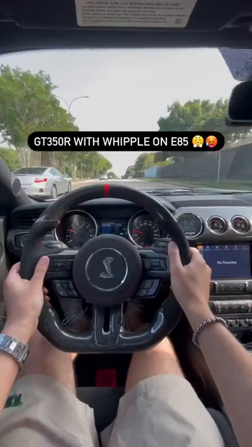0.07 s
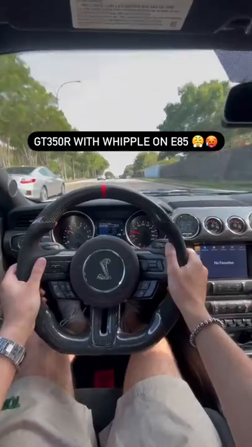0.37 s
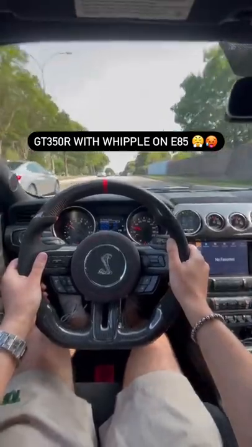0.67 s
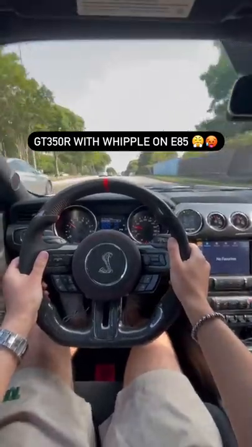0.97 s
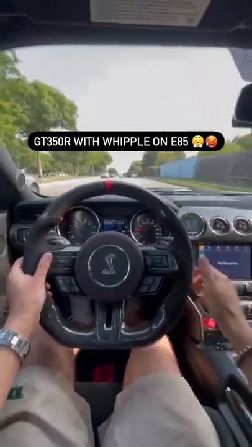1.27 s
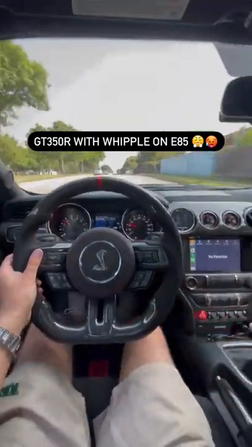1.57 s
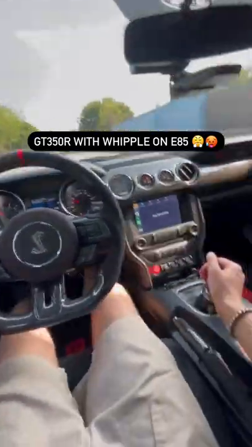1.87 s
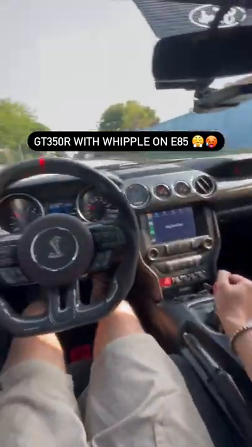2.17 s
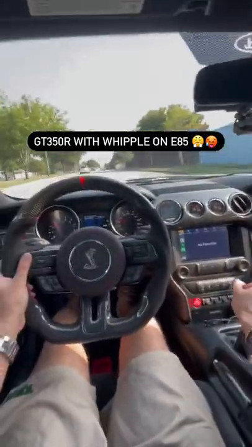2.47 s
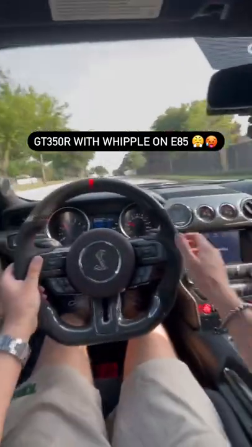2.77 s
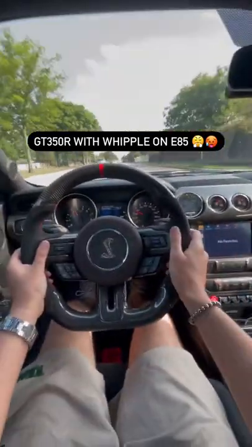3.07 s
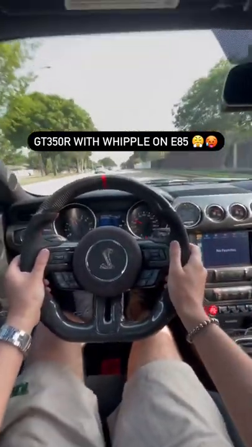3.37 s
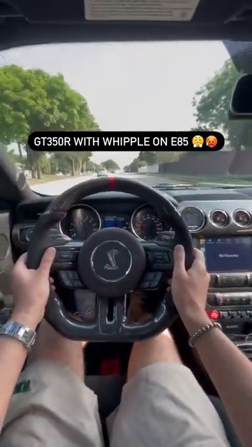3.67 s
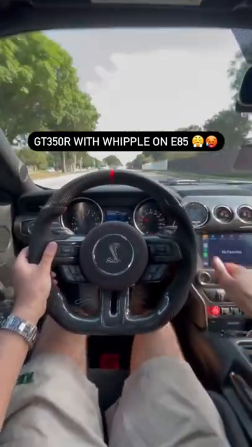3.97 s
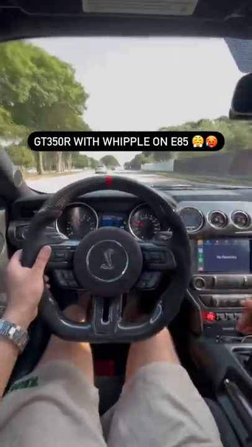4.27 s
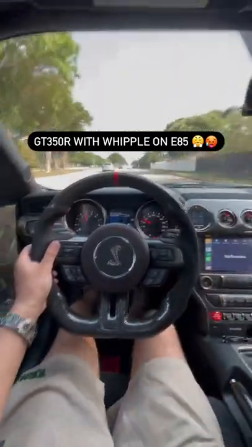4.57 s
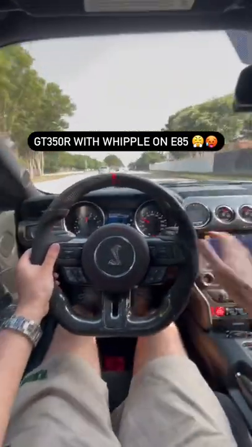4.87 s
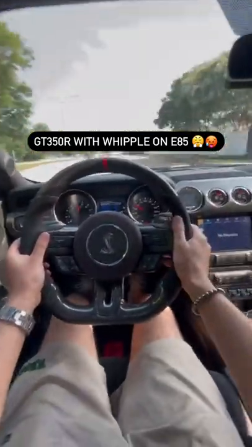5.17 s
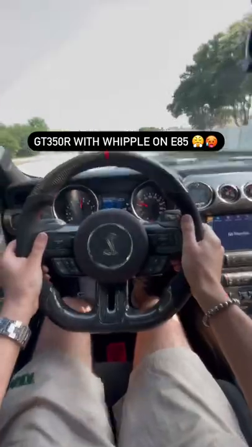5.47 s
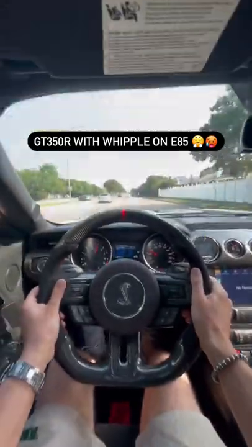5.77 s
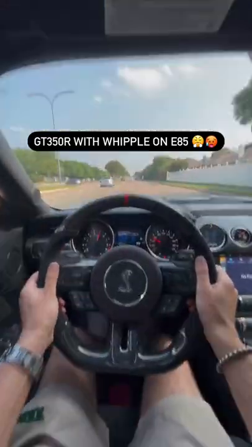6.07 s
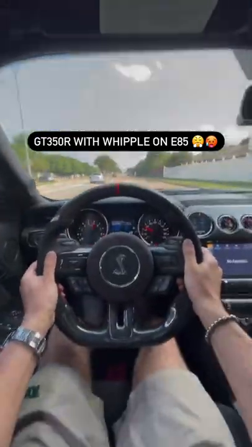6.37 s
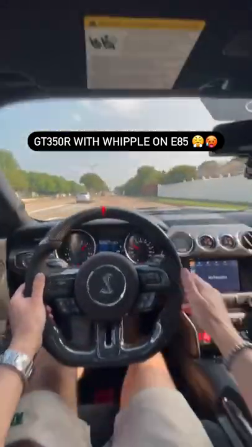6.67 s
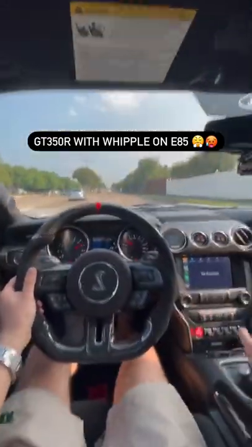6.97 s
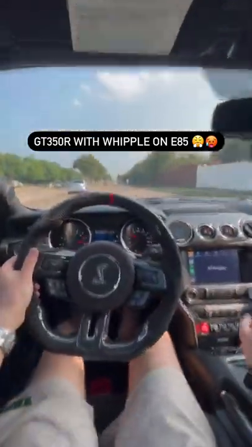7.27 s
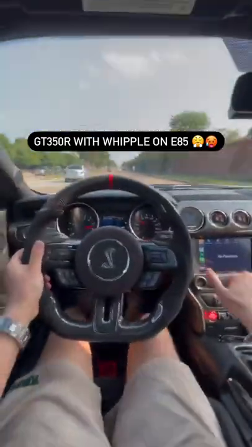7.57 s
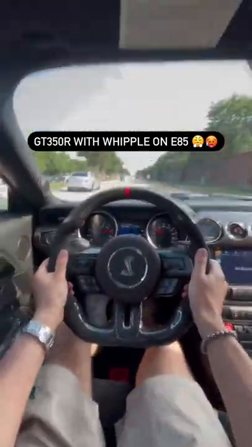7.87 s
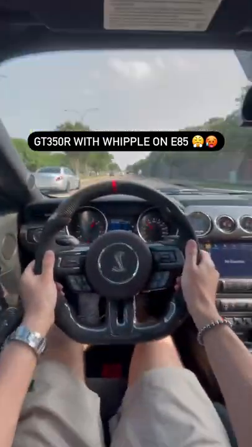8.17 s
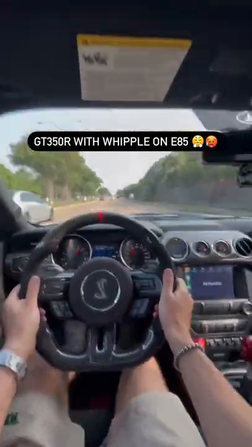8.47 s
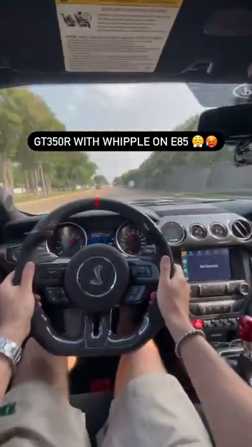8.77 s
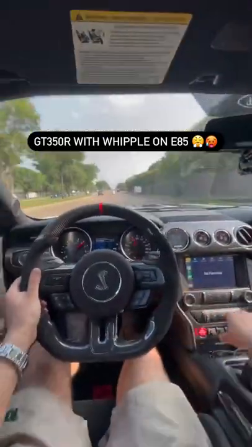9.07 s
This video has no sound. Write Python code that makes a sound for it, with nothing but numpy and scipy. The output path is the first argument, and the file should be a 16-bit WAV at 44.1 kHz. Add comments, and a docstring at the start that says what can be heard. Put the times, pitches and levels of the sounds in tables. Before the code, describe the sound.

Inside a sports car, the engine pulls, eases off with revs and pops, then roars to high revs with supercharger whine and shifts up.

```python
"""Inside a supercharged V8 coupe. Over the rumble of the road it pulls hard from low revs: uneven firings
drone and howl through the cabin, exhaust gas rasps once a firing and the intake rushes. From 2 s the
throttle lifts and two blipped downshifts follow, with pops in the pipe. From 5 s it runs to high revs,
the valves clattering and the blower's rotors whining. It shifts up just after 7 s and runs up again,
and a rasping scream swells near 9 s."""
import sys
import numpy as np
from scipy import signal
from scipy.fft import rfft, irfft, next_fast_len
from scipy.io import wavfile

SR = 44100
rng = np.random.default_rng(int(sys.argv[2]) if len(sys.argv) > 2 else 0)


def file_out(sig):
    """Save sig as 16-bit WAV at sys.argv[1]."""
    # one column per channel
    cols = np.atleast_2d(sig).T
    # limit, then scale
    lim = np.clip(cols, -1, 1)
    pcm = np.round(lim * 32767).astype(np.int16)
    wavfile.write(sys.argv[1], SR, pcm)


N = 402633
TIME = np.arange(N) / SR


def undb(db):
    """Decibels to gain."""
    return 10 ** (np.asarray(db) / 20)


def curves(table):
    """Each column of a timed table at every sample."""
    time_s, *columns = np.transpose(table)
    return [np.interp(TIME, time_s, column) for column in columns]


def response(table, hz):
    """Gain of a (freq_hz, gain_db) table at hz."""
    freq_hz, gain_db = np.transpose(table)
    return undb(np.interp(np.log(hz), np.log(freq_hz), gain_db))


def colour(x, table):
    """Filter by a (freq_hz, gain_db) table, rolling off above its last point; rms 1."""
    size = next_fast_len(N)
    hz = np.maximum(np.fft.rfftfreq(size, 1 / SR), 1)
    rolloff = np.minimum(table[-1][0] / hz, 1) ** 2
    y = irfft(rfft(x, size) * response(table, hz) * rolloff, size)[:N]
    return y / y.std()


def noise(table):
    """Coloured noise; rms 1."""
    return colour(rng.standard_normal(N), table)


def walk(rate_hz, count=2048):
    """Smooth random drift; spread near 1."""
    points = signal.resample(rng.standard_normal(count), 4 * count)
    return np.interp(TIME * rate_hz, np.arange(len(points)) / 4, points)


def engine_line(cycles, order, flutter_db, smear_rad):
    """Sine at order times the cycle rate; uneven combustion shakes its level and phase."""
    knots_s = TIME[::64]
    flutter, shake = (signal.resample(rng.standard_normal(count), len(knots_s)) for count in (120, 420))
    level = np.sqrt(2) * np.interp(TIME, knots_s, undb(flutter_db * flutter))
    phase = 2 * np.pi * (order * cycles + rng.random()) + smear_rad * np.interp(TIME, knots_s, shake)
    return level * np.sin((phase % (2 * np.pi)).astype(np.float32))


# road noise: time_s, level_db
ROAD_LEVEL = [(0.05, -12.5), (0.15, -18), (0.2, -18.5), (0.98, -25.5), (1.16, -19), (1.21, -30),
              (1.95, -25.5), (5.16, -19), (5.39, -24), (5.92, -20), (6.37, -23.5), (9.13, -24)]
# body and tyre spectra: freq_hz, gain_db
BODY_SPECTRUM = [(15, -38), (28, 11), (42, 23), (56, 25.5), (68, 19), (90, -59)]
TYRE_SPECTRUM = [(45, -40.5), (70, 6), (90, 6.5), (110, -0.5), (140, 5), (180, -4.5), (240, -4),
                 (400, -61.5)]


def road(body_db=-2.0, tyre_db=-1.0):
    """The body booms on its springs and the tyres drum on the floor."""
    rumble = undb(body_db) * noise(BODY_SPECTRUM) + undb(tyre_db) * noise(TYRE_SPECTRUM)
    return undb(curves(ROAD_LEVEL)[0]) * rumble


# engine speed: time_s, speed_rpm
ENGINE_SPEED = [(0.0, 2338), (0.24, 2443), (0.54, 2552), (0.86, 2668), (0.98, 2733), (1.2, 2799),
                (1.28, 2859), (1.7, 2958), (1.84, 2938), (2.14, 2715), (2.22, 2789), (2.36, 3334),
                (2.48, 3521), (2.8, 3450), (3.0, 3699), (3.18, 3581), (3.34, 3728), (3.5, 3729),
                (3.8, 3869), (4.0, 3816), (4.1, 3462), (4.22, 3287), (4.44, 4373), (4.52, 4594),
                (4.7, 4186), (4.86, 4038), (5.32, 5032), (5.46, 5280), (5.52, 5254), (5.7, 4969),
                (5.82, 5045), (5.94, 5197), (6.0, 5388), (6.14, 5547), (6.34, 6039), (6.44, 6339),
                (6.58, 6605), (6.68, 6967), (6.74, 7016), (6.88, 7381), (6.96, 7429), (7.12, 8181),
                (7.54, 7003), (7.6, 7108), (7.82, 5045), (7.84, 5016), (8.1, 5599), (8.32, 5683),
                (8.42, 5914), (8.62, 6026), (8.68, 6228), (8.92, 6328), (9.04, 6530), (9.12, 6733)]
# engine load, as air rushing past the throttle: time_s, level_db
ENGINE_LOAD = [(0.05, -36), (0.93, -33.5), (1.64, -36), (1.84, -50.5), (2.07, -57.5), (2.29, -49),
               (2.335, -43.5), (2.4, -43), (2.45, -42), (2.56, -54), (2.68, -54.5), (2.72, -49),
               (2.76, -55.5), (3.24, -56.5), (3.41, -43.5), (3.84, -37), (4.22, -56.5), (4.5, -32),
               (4.8, -50), (4.86, -42), (5.03, -53.5), (5.36, -49), (5.49, -34), (5.61, -36), (5.79, -47.5),
               (5.86, -48.5), (6.02, -33.5), (6.17, -29.5), (6.73, -30.5), (7.13, -34), (7.23, -44),
               (7.43, -36.5), (7.61, -47.5), (7.71, -42.5), (8.17, -34), (9.0, -32), (9.13, -33.5)]
# exhaust effort, as the strength of its bark: time_s, level_db
EXHAUST_EFFORT = [(0.05, -19.5), (0.6, -22), (0.8, -19.5), (1.14, -20.5), (1.66, -26.5), (1.72, -39.5),
                  (1.79, -48.5), (2.15, -55), (2.32, -20), (2.45, -23), (2.53, -48), (2.7, -36.5),
                  (2.78, -54), (3.26, -35), (3.36, -26), (3.87, -22.5), (4.2, -44), (4.47, -13.5),
                  (4.55, -18.5), (4.6, -37.5), (4.78, -35.5), (4.83, -31.5), (5.0, -39), (5.33, -31.5),
                  (5.46, -19.5), (5.56, -19), (5.76, -26), (5.94, -22.5), (6.0, -16.5), (6.15, -20),
                  (6.6, -24), (6.67, -19), (7.02, -25.5), (7.12, -20), (7.2, -28.5), (7.51, -31.5),
                  (7.56, -37), (7.79, -28), (8.77, -23), (8.98, -19), (9.13, -25)]
# drive by part: level_db, db_per_load_db, db_per_effort_db, db_per_rev_octave
PART_DRIVE = {"bank": (1, -0.2, 0.1, 0.095), "firing": (-1.1, -0.079, 0.89, 0.61),
              "overtones": (-0.68, -0.058, 1, 0), "burble": (-34, 0.12, 0.6, 3),
              "howl": (-23.5, 0.3, 0.58, 5), "roar": (-30, -0.39, 0.47, 0.5), "bark": (-27, 0.77, 1, -4.5),
              "rasp": (-27, 0.16, 0.54, -1), "clatter": (-30.5, 0.99, 0.2, 1.5),
              "rush": (-30.5, 1.23, 0.16, 0.16), "blower": (-10, 1.18, 0.35, 13.5)}


def engine_state(open_throttle_db=-34, hard_pull_db=-20, mid_rpm=4000):
    """Load, effort and revs set each part's gain; a closed throttle burns raggedly, smearing the lines."""
    rpm = curves(ENGINE_SPEED)[0]
    load_db = curves(ENGINE_LOAD)[0] - open_throttle_db
    effort_db = curves(EXHAUST_EFFORT)[0] - hard_pull_db
    octaves = np.log2(rpm / mid_rpm)
    gain = {part: undb(db + per_load * load_db + per_effort * effort_db + per_octave * octaves)
            for part, (db, per_load, per_effort, per_octave) in PART_DRIVE.items()}
    smear = np.interp(effort_db, [-14, -4], [1.7, .25]) * np.interp(rpm, [4500, 5500], [1, .28])
    return rpm, gain, smear


def firings(cycles, scatter_db=2.0, uneven_db=2, skew=0.036, cylinders=8):
    """One lopsided pulse per cylinder; also the latest firing's age (0 to 1) and strength."""
    jitter = .06 * walk(200)  # each charge burns a little early or late
    beat = cylinders * cycles + skew * np.sin(2 * np.pi * cycles) + jitter
    index = np.maximum(np.floor(beat), 0).astype(int)
    random_db = scatter_db * rng.standard_normal(N // cylinders)[index]
    strength = undb(random_db + uneven_db * np.cos(2 * np.pi * index / cylinders))
    pulses = np.diff(index, prepend=index[0]) * strength
    return pulses, beat % 1, strength


# bank boom, sinking after the upshift: time_s, level_db
BANK_LEVEL = [(7.35, -0.5), (7.85, -6), (8.6, -3.5)]
# pipe and cabin standing waves met by 0.5, 1, 2 and 3 times the firing rate: freq_hz, gain_db
BANK_RESPONSE = [(80, -23), (92, -37.5), (128, -33), (138, -21), (176, -21), (212, -19.5), (233, -38.5),
                 (245, -23.5), (270, -18)]
FIRING_RESPONSE = [(160, -16), (178, -27), (200, -27.5), (226, -24), (335, -22.5), (358, -17.5), (375, -21),
                   (398, -14), (431, -31.5), (450, -20), (480, -17), (505, -21)]
SECOND_RESPONSE = [(316, -17), (331, -12.5), (344, -28.5), (390, -17.5), (438, -27), (459, -31), (520, -18),
                   (662, -42.5), (693, -25), (724, -19), (772, -36), (797, -25), (832, -44), (855, -21),
                   (917, -22.5), (1007, -22.5), (1055, -48), (1088, -24)]
THIRD_RESPONSE = [(475, -18), (533, -14.5), (618, -38), (757, -27.5), (793, -50), (891, -41), (993, -52),
                  (1049, -29), (1090, -26.5), (1160, -29), (1244, -33), (1330, -44), (1633, -66)]
# the same for the sidebands below 2 and 3 times the firing rate: freq_hz, gain_db
SECOND_SIDEBAND = [(296, -40.5), (328, -24.5), (354, -44), (374, -38), (448, -40), (469, -23), (544, -26.5),
                   (565, -29), (660, -30), (736, -26), (808, -30), (1020, -26)]
THIRD_SIDEBAND = [(455, -36), (508, -36.5), (528, -19.5), (574, -25.5), (708, -43), (748, -18),
                  (784, -36.5), (1138, -21.5), (1174, -32), (1239, -26), (1371, -51)]


def drone(cycles, cycle_hz, gain, smear):
    """Low firing harmonics; the headers pair cylinders unevenly, so half the firing rate booms too."""
    lines = ((3.995, gain["bank"] * undb(curves(BANK_LEVEL)[0]), BANK_RESPONSE),
             (8.02, gain["firing"], FIRING_RESPONSE),
             (16.04, gain["overtones"], SECOND_RESPONSE),
             (23.95, gain["overtones"], THIRD_RESPONSE),
             (15, gain["overtones"], SECOND_SIDEBAND),
             (23, gain["overtones"], THIRD_SIDEBAND))
    out = 0
    for order, level, path in lines:
        line = engine_line(cycles, order, flutter_db=1.2, smear_rad=np.maximum(.12, smear * order / 40))
        out += level * response(path, order * cycle_hz) * line
    return out


# path from exhaust to cabin: freq_hz, gain_db
CABIN_RESPONSE = [(120, -18.5), (200.0, -11.5), (280.0, -11), (350.0, -14), (430.0, -8.5), (520.0, -2),
                  (620.0, -8), (730.0, -6), (810.0, -10), (950.0, -5), (1150.0, -12.5), (1300.0, -22),
                  (1500.0, -28), (2200, -23)]
# howl lines: cycle_order, level_db
HOWL_LINES = [(25, -11.5), (31, -7.5), (32, -1), (33, -9), (39, -4.5), (40, -6.5), (41, -5), (47, -2),
              (48, -2), (49, -11.5), (55, 3), (56, -5.5)]


def howl(cycles, cycle_hz, rpm, smear, muffler_hz=1230, boost_db=9, merge_rpm=3160, db_per_octave=31.5):
    """Distinct firings ring the cabin up to the muffler's cut-off; as revs rise they merge and fade."""
    out = 0
    for order, db in HOWL_LINES:
        hz = order * cycle_hz
        line = engine_line(cycles, order, flutter_db=2.8, smear_rad=smear * order / 55)
        muffler = 1 / np.sqrt(1 + (hz / muffler_hz) ** 20)
        out += undb(db + boost_db) * response(CABIN_RESPONSE, hz) * muffler * line
    octaves_over = np.maximum(np.log2(rpm / merge_rpm), 0)
    return undb(-db_per_octave * octaves_over) * out


# lines from unequal cylinders: cycle_order, level_db
BURBLE_LINES = [(5, -12.5), (6, -3.5), (7, 11.5), (9, 4), (10, 4), (11, -3), (12, 4.5), (13, 1), (14, 2),
                (17, 3), (18, 3), (19, -3), (20, 2), (21, -0.5), (22, -6), (25, 2), (26, 2.5), (27, 1),
                (28, -0.5), (29, -2), (30, -4), (31, 8.5), (32, -2), (45, 2), (47, 2)]


def burble(cycles, cycle_hz, smear):
    """No two cylinders blow alike: multiples of the cycle rate sweep through the cabin's resonances."""
    out = 0
    for order, db in BURBLE_LINES:
        line = engine_line(cycles, order, flutter_db=5.0, smear_rad=smear * order / 20)
        out += undb(db) * response(CABIN_RESPONSE, order * cycle_hz) * line
    return out


def turbulence(age, strength, decay_firings, steady):
    """Gas noise that flares at each firing and decays toward a steady floor."""
    return rng.standard_normal(N) * (steady + strength * np.exp(-age / decay_firings))


# exhaust gas spectra: freq_hz, gain_db
ROAR_SPECTRUM = [(130, -23), (220, -3.5), (300, 8.5), (400, 7.5), (450, 3), (530, 9), (620, 1.5),
                 (800, -29)]
RASP_SPECTRUM = [(550, -42.5), (720, 6.5), (810, -6.5), (930, 5), (1050, 7.5), (1200, 2), (1320, -6),
                 (1480, -14.5), (2000, -43)]


def exhaust(pulses, age, strength, gain):
    """Each pulse's sharp front barks in the pipe; torn gas roars and rasps behind it."""
    roar = colour(turbulence(age, strength, decay_firings=0.43, steady=0.33), ROAR_SPECTRUM)
    bark = colour(pulses, RASP_SPECTRUM)
    rasp = colour(turbulence(age, strength, decay_firings=1.0, steady=0.13), RASP_SPECTRUM)
    return gain["roar"] * roar + gain["bark"] * bark + gain["rasp"] * rasp


# valve clatter spectrum: freq_hz, gain_db
CLATTER_SPECTRUM = [(1000, -4.5), (1450, 1), (1800, -1), (2300, -1.5), (2800, -2), (3150, -5), (4000, -9),
                    (5500, -27)]


def valves(cycles, cycle_hz, age, throb=0.44, size=512):
    """Valve gear and gas ring alike every cycle; at high revs this stands out as a fine comb of lines."""
    pattern = np.interp(cycles * size, np.arange(size), rng.standard_normal(size), period=size)
    comb_share = np.interp(cycle_hz, [40, 47], [.15, .65])
    comb = np.sqrt(comb_share) * colour(pattern, CLATTER_SPECTRUM)
    hiss = np.sqrt(1 - comb_share) * noise(CLATTER_SPECTRUM)
    return (1 + throb * (.5 - age)) * (comb + hiss)


# intake air spectrum: freq_hz, gain_db
RUSH_SPECTRUM = [(2400, -17.5), (3300, -18), (4300, -7.5), (5400, -1), (6200, -1), (7000, -1.5), (8000, -4),
                 (9300, -5), (10000, -19.5)]


def intake_rush(age, strength):
    """Air hisses past the throttle, pulsing with the firings."""
    return colour(turbulence(age, strength, decay_firings=0.93, steady=1.), RUSH_SPECTRUM)


# intake resonances: centre_hz, width_hz, gain_db
INTAKE_MODES = [(276, 41, -20), (681, 52, -28.5), (1887, 30, -33.5), (2080, 29, -35.5), (2267, 230, -35.5),
                (2790, 140, -30.5), (3447, 140, -39), (4148, 70, -32), (4840, 160, -41.5),
                (5470, 110, -37.5), (6450, 490, -41.5)]
# rotor harmonics: lobe_harmonic, level_db
ROTOR_LINES = [(1, 0), (3, 0), (4, -3), (5, -0.5), (6, 1.5), (7, 0), (8, 0.5), (9, 0)]
# whine, flaring as boost builds: time_s, low_harmonics_db, high_harmonics_db
WHINE_LEVEL = [(5.7, -2, -11), (6.05, -4, -10), (6.32, -7, -6), (6.4, 3.5, -2), (6.55, -1.5, -3),
               (6.72, 1.5, -4), (6.9, 3, -8), (7.05, -13, -12), (7.95, -11, -16), (8.15, 2, 4),
               (8.35, 2.5, -2), (8.6, -3, -2), (8.72, -0.5, 1), (8.92, -5, -0.5), (9.1, -1, -2)]


def blower(cycles, cycle_hz, lobes_per_cycle=13.25, lobes=4, wobble=.3):
    """Meshing rotors chop the intake air; each harmonic sings out as it crosses a resonance."""
    grid_hz = np.arange(0, SR // 2, 4)
    duct = sum(undb(db) / (1 + (2 * (grid_hz - hz) / width_hz) ** 2) for hz, width_hz, db in INTAKE_MODES)
    low, high = undb(curves(WHINE_LEVEL))
    low *= 1 + wobble * np.sin(2 * np.pi * cycles * lobes_per_cycle / lobes)  # unequal lobes: sidebands
    out = 0
    for harmonic, db in ROTOR_LINES:
        order = harmonic * lobes_per_cycle
        # low harmonics rasp, high ones whistle
        swell, flutter_db, smear_rad = (low, 3, .35) if harmonic <= 4 else (high, 1.2, .15)
        resonance = np.interp(order * cycle_hz, grid_hz, duct)
        out += undb(db) * swell * resonance * engine_line(cycles, order, flutter_db, smear_rad)
    return out


# exhaust pops and barks: start_s, level_db, decay_s, crack_re_body_db
POP_EVENTS = [(2.32, -27, 0.047, -7.5), (2.719, -34, 0.014, -13), (3.182, -41, 0.013, -19),
              (3.491, -32.5, 0.0075, -22.5), (3.518, -31, 0.012, -18), (4.835, -22.5, 0.021, -22),
              (5.85, -30.5, 0.018, -18), (7.665, -27.5, 0.014, -19)]


def pops():
    """Late-burning fuel cracks in the pipe; a stab of throttle barks the same way."""
    body, crack = noise(RASP_SPECTRUM), noise(CLATTER_SPECTRUM)
    out = 0
    for start_s, db, decay_s, crack_db in POP_EVENTS:
        envelope = (TIME >= start_s) * np.exp(-np.abs(TIME - start_s) / decay_s)
        out += undb(db) * envelope * (body + undb(crack_db) * crack)
    return out


# scream swell: time_s, level_db
SCREAM_LEVEL = [(7.9, -84), (8.35, -35), (8.82, -36), (8.97, -21), (9.13, -36)]
# scream lines: cycle_order, level_db
SCREAM_CLUSTER = [(23, 3), (24, -3.5), (25, -4.5), (26, -3.5), (27, -10), (29, -15.5), (31, -7.5)]


def scream(cycles):
    """Rough engine lines around and above three times the firing rate swell late in the last run."""
    cluster = sum(undb(db) * engine_line(cycles, order, flutter_db=2, smear_rad=0.86)
                  for order, db in SCREAM_CLUSTER)
    return undb(curves(SCREAM_LEVEL)[0]) * cluster


# stereo width: freq_hz, side_re_mid_db
STEREO_WIDTH = [(60, -25), (160, -23), (215, -19), (290, -7), (420, -5), (530, -7), (680, -1), (1150, 0),
                (1500, -2), (2200, -3), (3000, 2), (4150, -1), (4700, 2), (6000, -6), (7500, 3), (9500, 5)]
# out-of-step direct sound in the side, -1 to 1, positive where left leads: freq_hz, lead_share
LEFT_LEAD = [(170, -.45), (330, .45), (550, -.1), (1000, -.55), (2200, 0), (4150, .45), (5500, -.35),
             (7500, .5)]


def cabin(direct, scattered, balance_db=0.32):
    """Bass reaches both sides alike; higher sound comes out of step, with scatter from glass and trim."""
    hz = np.maximum(np.fft.rfftfreq(N, 1 / SR), 1)
    width = response(STEREO_WIDTH, hz)
    freq_hz, lead_share = np.transpose(LEFT_LEAD)
    lead = np.interp(np.log(hz), np.log(freq_hz), lead_share)
    mid, scatter = (rfft(x) / np.sqrt(1 + width ** 2) for x in (direct, scattered))
    side = width * (1j * lead * mid + np.sqrt(1 - lead ** 2) * scatter)
    left = irfft(mid + side, N) * undb(balance_db / 2)
    right = irfft(mid - side, N) * undb(-balance_db / 2)
    return np.array([left, right])


def scene():
    """Engine, blower and road reach the driver by a direct and a scattered path with the same firings."""
    rpm, gain, smear = engine_state()
    cycle_hz = rpm / 120  # two crank turns per four-stroke cycle
    cycles = np.cumsum(cycle_hz * (1 + 0.00198 * walk(45))) / SR
    pulses, age, strength = firings(cycles)

    def path():
        return (road()
                + drone(cycles, cycle_hz, gain, smear)
                + gain["howl"] * howl(cycles, cycle_hz, rpm, smear)
                + gain["burble"] * burble(cycles, cycle_hz, smear)
                + exhaust(pulses, age, strength, gain)
                + gain["clatter"] * valves(cycles, cycle_hz, age)
                + gain["rush"] * intake_rush(age, strength)
                + gain["blower"] * blower(cycles, cycle_hz)
                + pops()
                + scream(cycles))

    return cabin(direct=path(), scattered=path())


def record(dry, start_s=.036, rise_s=.002, ceiling=.95, top_hz=9900):
    """Abrupt onset, rounded peaks, steep low-pass."""
    onset = np.clip((TIME - start_s) / rise_s, 0, 1)
    rounded = dry / (1 + (dry / ceiling) ** 6) ** (1 / 6)
    lowpass = signal.ellip(10, .2, 90, top_hz, fs=SR, output="sos")
    return signal.sosfilt(lowpass, rounded * onset)


dry = scene()
out = record(dry)
file_out(out)
```